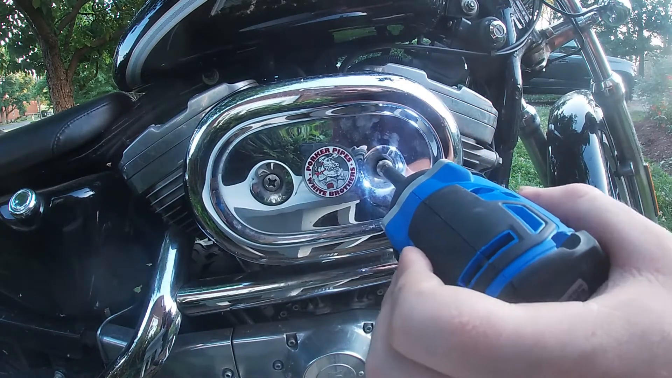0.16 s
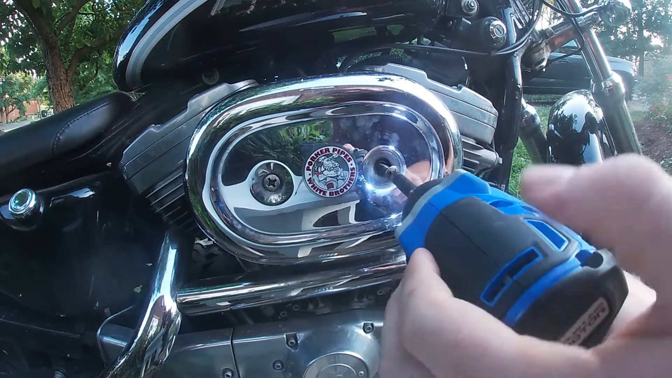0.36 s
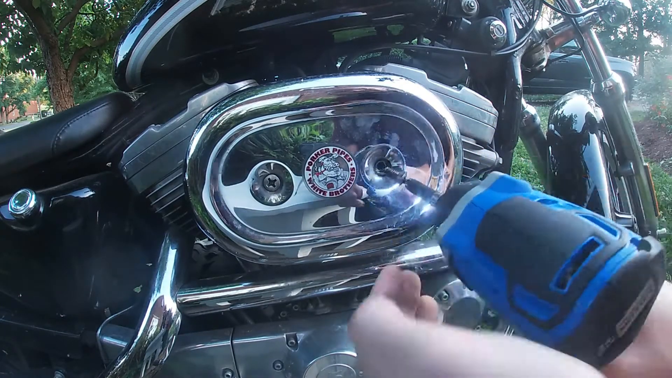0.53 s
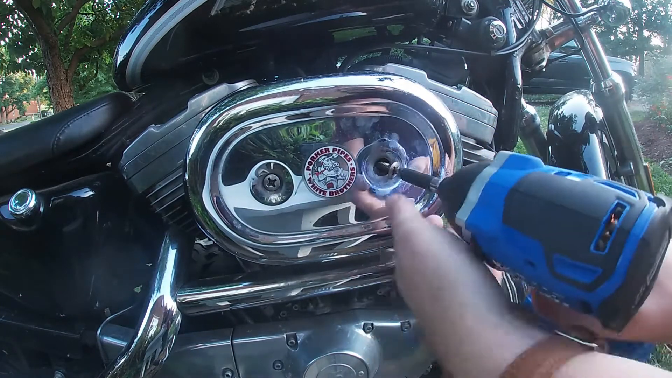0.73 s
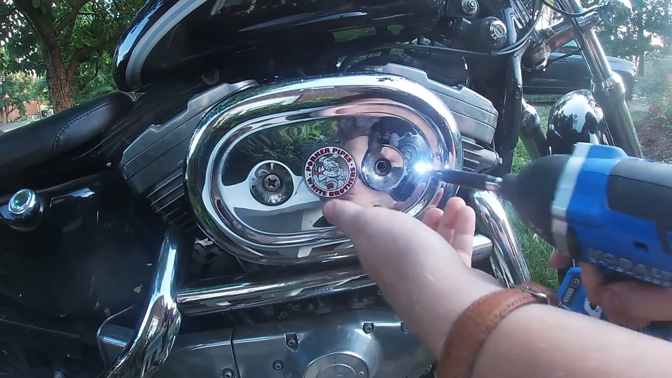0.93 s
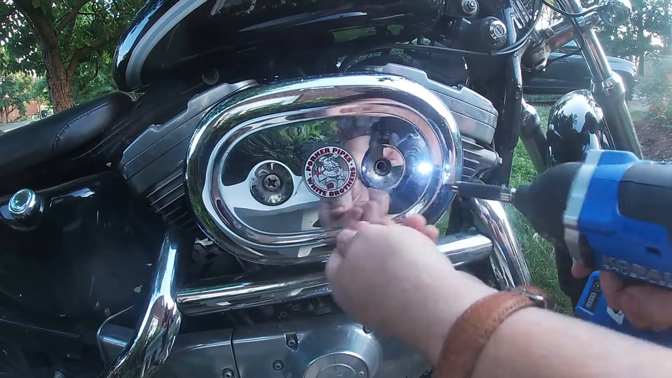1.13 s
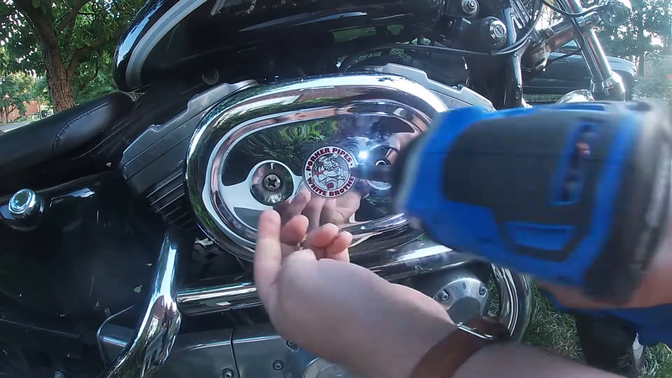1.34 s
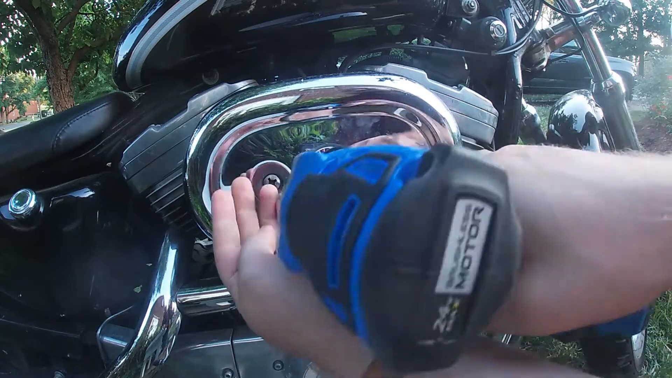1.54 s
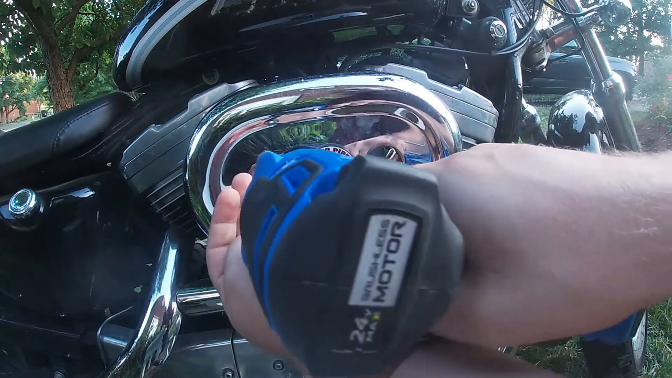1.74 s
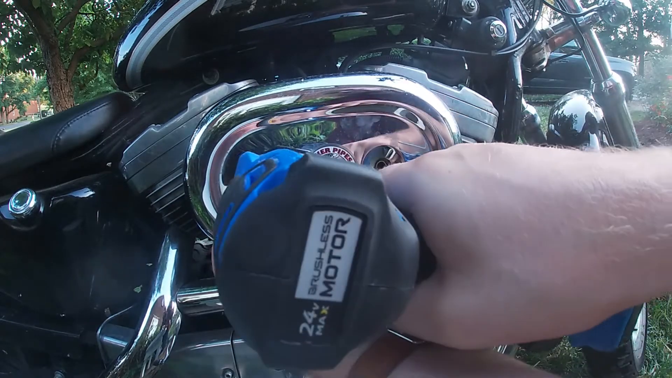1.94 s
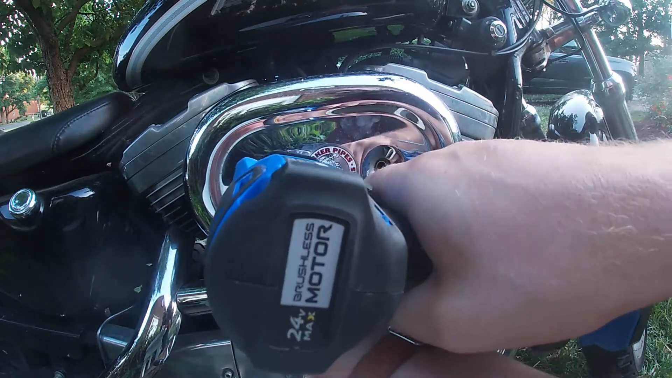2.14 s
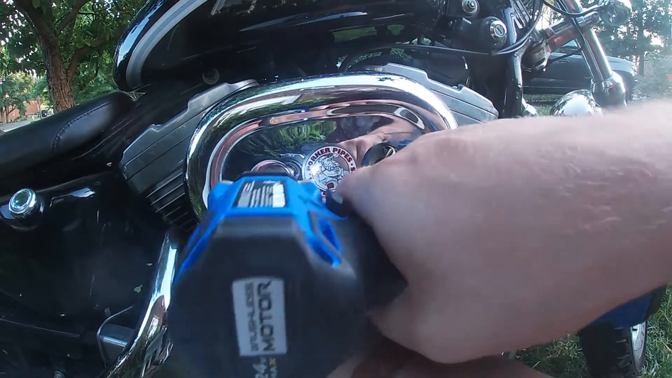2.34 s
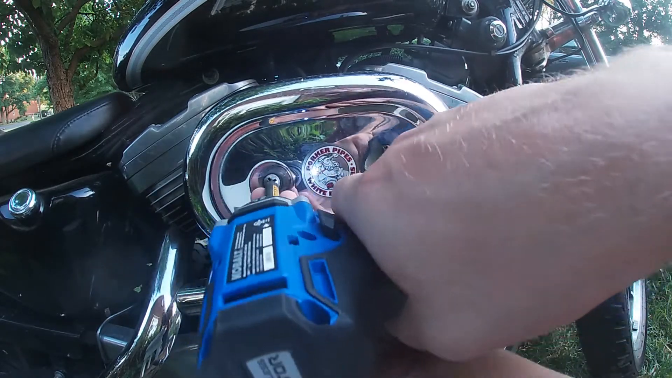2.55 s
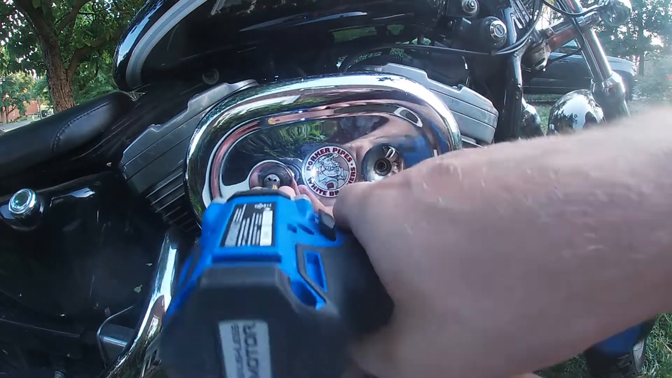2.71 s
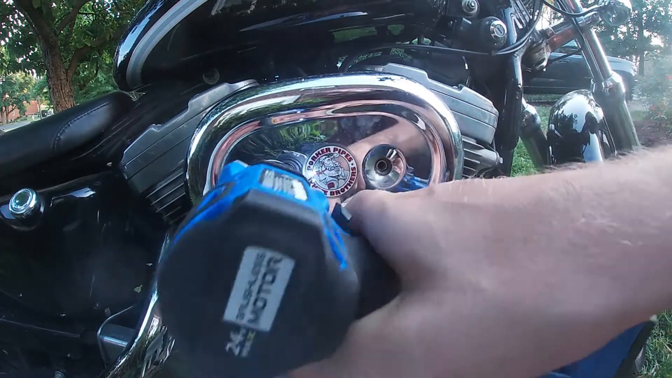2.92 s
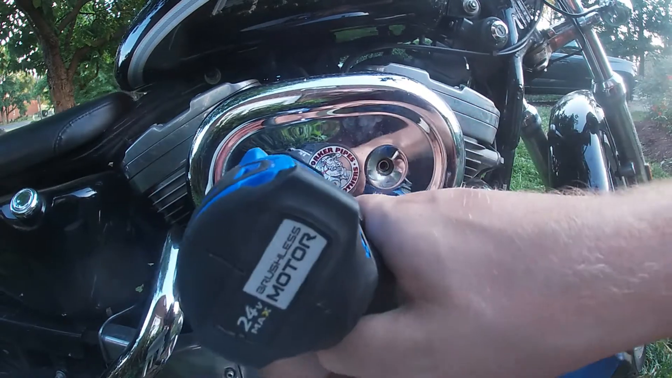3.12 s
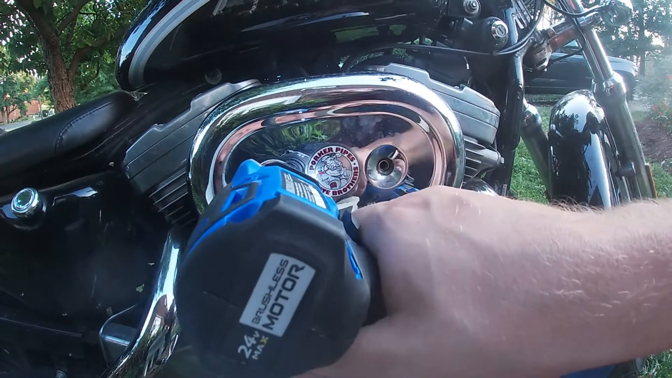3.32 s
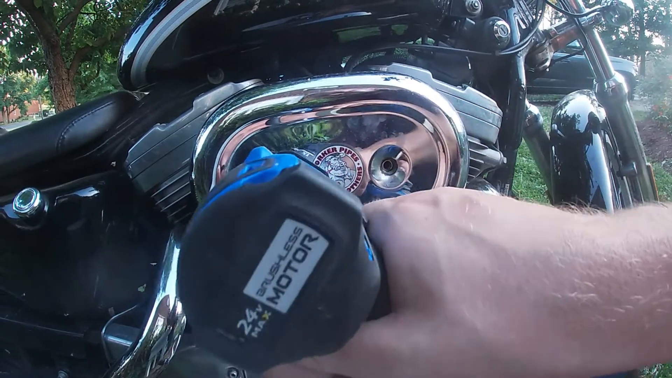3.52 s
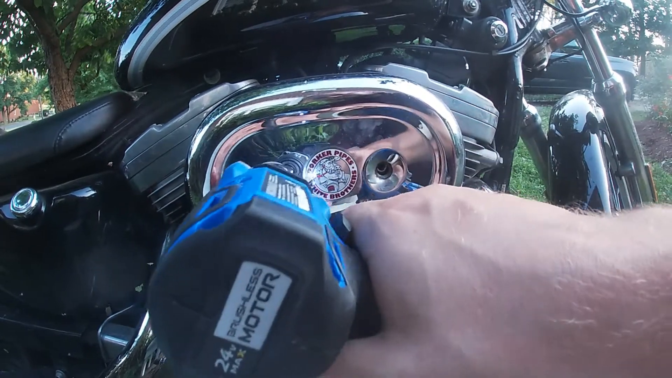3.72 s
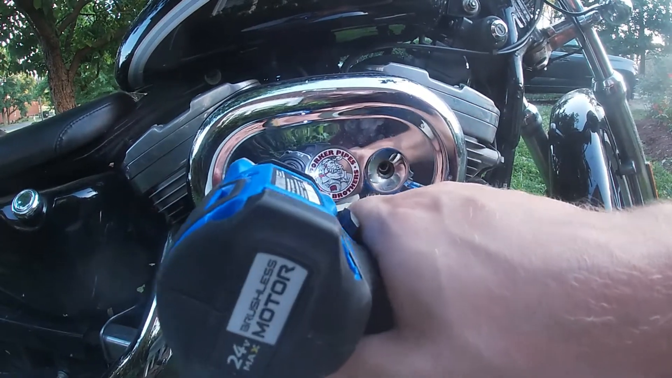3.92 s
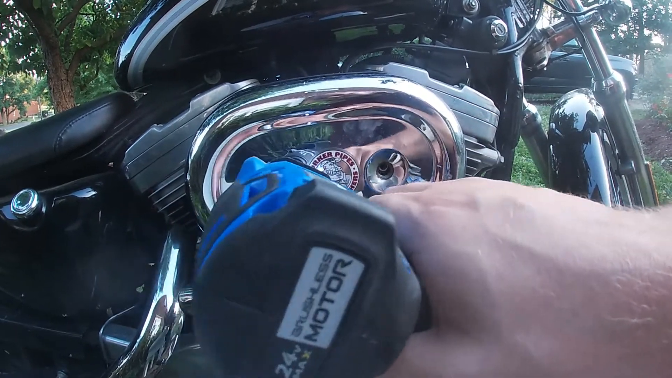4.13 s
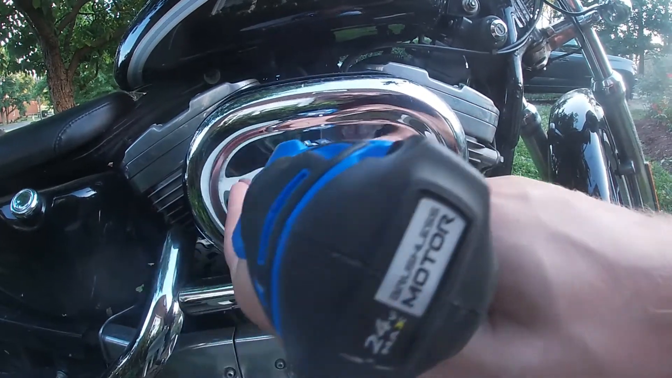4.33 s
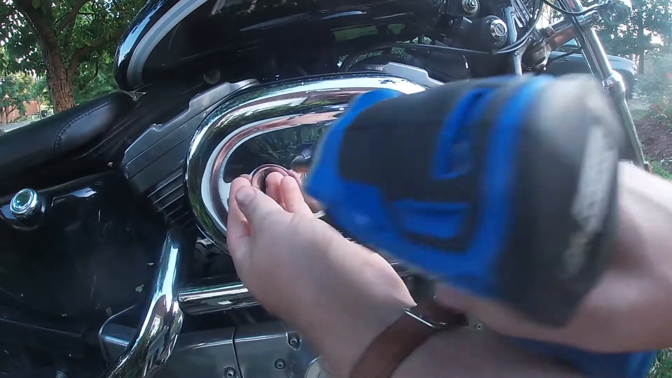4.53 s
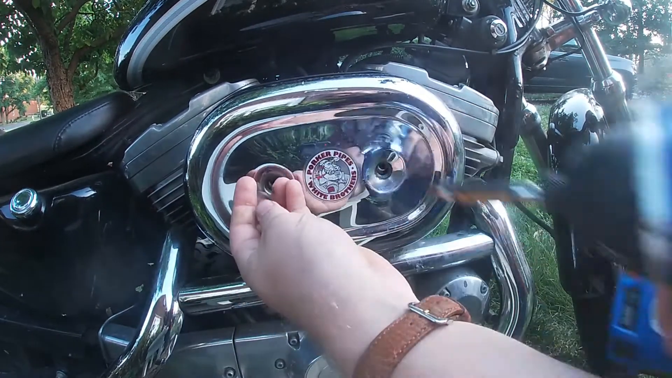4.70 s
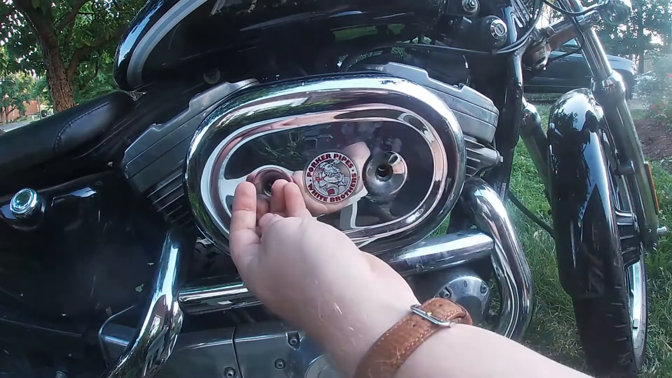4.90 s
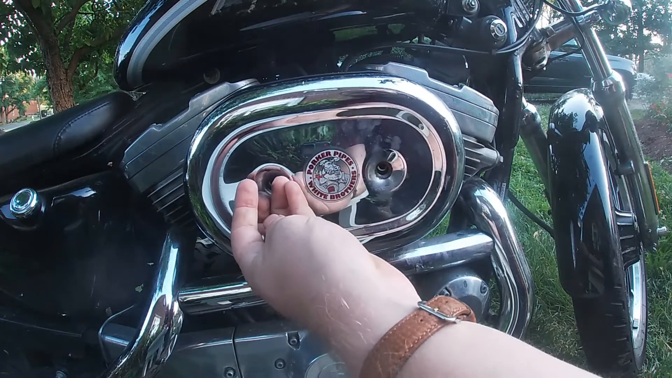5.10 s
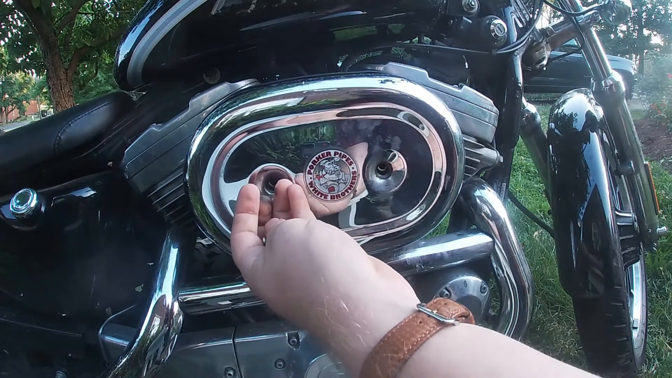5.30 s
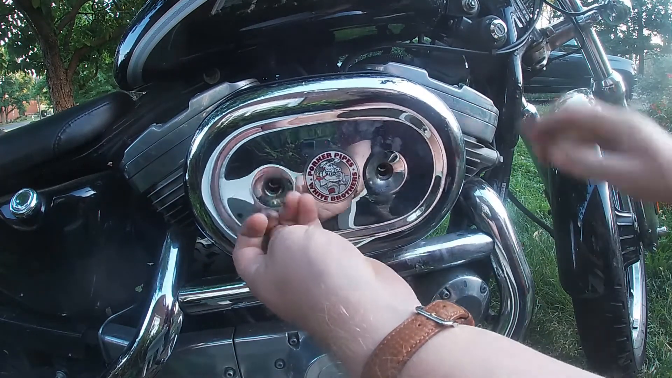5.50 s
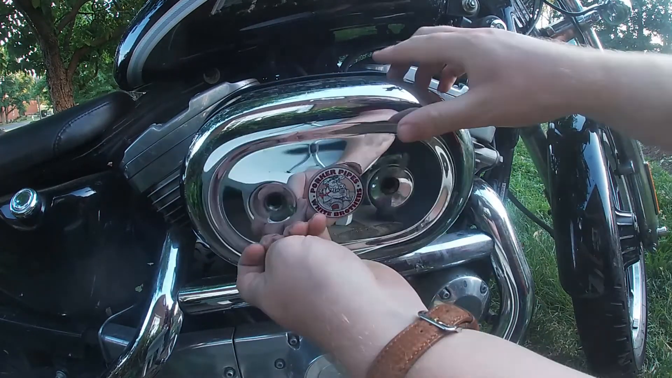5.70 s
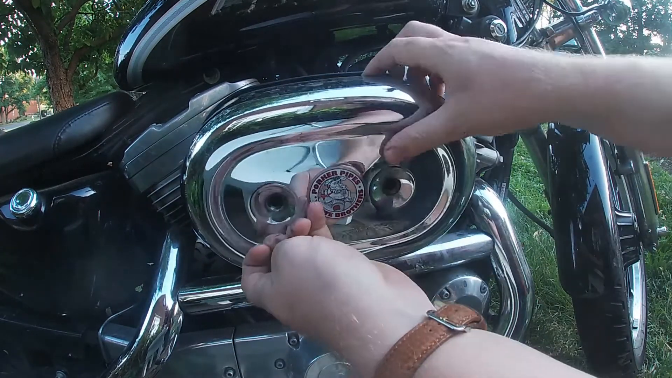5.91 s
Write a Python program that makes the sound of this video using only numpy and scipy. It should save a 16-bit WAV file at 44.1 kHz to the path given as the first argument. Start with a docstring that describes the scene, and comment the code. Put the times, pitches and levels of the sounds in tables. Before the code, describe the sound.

A cordless impact driver whirs in three short bursts outdoors, amid knocks and ticks on a metal cover, before a car swells past.

```python
"""Outdoors, close to a motorcycle: a cordless impact driver spins two bolts out of the chrome air-cleaner
cover. Three trigger pulls whine up and brake: commutation rings the stator, gears rattle in the housing.
On the second, hammer blows free a tight bolt. Bit, bolts and hands knock, tick and rub on the cover,
ringing its modes; an arm bumps the microphone. Faint birds chirp over far traffic, and at the end a car
swells past with tyre and exhaust noise."""
import sys
import numpy as np
from scipy import signal
from scipy.fft import rfft, irfft, next_fast_len
from scipy.io import wavfile
from scipy.ndimage import uniform_filter1d

SR = 44100
rng = np.random.default_rng(int(sys.argv[2]) if len(sys.argv) > 2 else 0)


def to_wav(s):
    """Save 16-bit WAV."""
    ch = np.atleast_2d(s).T  # columns
    pcm = np.round(np.clip(ch, -1, 1) * 32767)  # PCM
    wavfile.write(sys.argv[1], SR, pcm.astype(np.int16))


N = 266893

# street noise spectra (frequency [Hz], relative density [dB])
YARD_SPECTRUM = [(15, -50), (25, -9.5), (76, 1.5), (208, -2.5), (286, -9.5), (511, -18.5), (569, -22.5),
                 (846, -13), (966, -16.5), (1290, -17), (1970, -24), (7220, -42), (14000, -72)]
TYRE_SPECTRUM = [(190, -46), (330, -2), (679, 0.5), (846, -3), (989, -1), (1230, -7.5), (1400, -5.5),
                 (3810, -20.5), (5460, -26), (7720, -49), (14000, -56)]
EXHAUST_SPECTRUM = [(15, -51.5), (25, -3), (48, -25), (64, 1), (81, 0), (145, -9), (220, 1.5), (259, -10),
                    (300, -8), (390, -55), (660, -120)]
# street noise envelopes (time [s], relative level [dB])
AIR_ENVELOPE = [(0.0, -50), (0.24, -51.5), (4.4, -44)]
ENGINE_ENVELOPE = [(0.0, -50), (1.13, -49), (1.79, -43), (2.42, -46), (5.8, -37.5), (6.05, -37.5)]
TYRE_ENVELOPE = [(4.3, -59.5), (4.72, -43), (4.95, -40), (5.45, -42.5), (6.05, -41.5)]
# resonances (frequency [Hz], width [Hz], gain [dB])
COVER_MODES = [(282, 13, 10), (421, 28, 12), (776, 117, 6), (1624, 190, 4.5), (1986, 35, 2.5),
               (2610, 650, 4.5), (3190, 400, -0.5), (3840, 380, 1), (4430, 200, -3), (5800, 540, 0),
               (8560, 167, -3.5)]
HOUSING_MODES = [(790, 150, -4), (1470, 130, -15), (2580, 240, -7), (3980, 89, -8.5), (4890, 470, -15),
                 (9160, 350, -1)]
MIC_CASE_MODES = [(277, 155, 11.5), (1118, 90, 13), (1217, 66, -6)]
BUZZ_MODES = [(4740, 1100, 4), (6460, 1100, 5), (8200, 840, 1.5), (10500, 630, -9)]
# light metal-on-metal contacts (time [s], level [dB])
TICKS = [(0.083, -54), (0.8424, -48.5), (0.928, -45), (2.153, -43.5), (2.842, -47), (3.456, -47.5),
         (3.896, -45), (4.396, -60), (4.5296, -53), (4.604, -43), (5.374, -50.5), (5.802, -48.5)]
# trigger pulls (start [s], spin-up [s], coast [s], top rate [Hz], rate at braking [Hz],
# start lag [1 = none], rattle [dB], rattle treble [dB], kicks [dB], powered whine [dB],
# coasting whine [dB], mesh tone re whine [dB], cover hollow [dB], planet tones re rattle [dB])
PULLS = [(.117, .198, 0.13, 3787, 2910, 1.044, -22.5, 2, -21, -17, -17, 7, -15, -25),
         (3.497, 0.16, 0.11, 3680, 2677, 1.42, -22.5, 0, -13.5, -22, -19, -18, 8.5, -23),
         (3.915, .183, 0.11, 4173, 3143, 1.18, -22, -3.5, -17.5, -13.5, -28, -8, 3.5, -7)]
# gear rattle spectrum (frequency [Hz], relative density [dB])
GEAR_SPECTRUM = [(88, -50), (150, -10), (366, -7), (462, -4), (583, -9), (1340, -6.5), (1450, -6.5),
                 (1700, -6.5), (3830, -3.5), (6110, -17), (9360, -28), (15500, -44.5)]
# bit, bolt and tool striking the cover (time [s], level [dB], contact [ms], low-end weight [dB])
KNOCKS = [(.497, -29, 0.013, -13), (.508, -29, 0.011, 9.5), (0.7094, -40, 0.089, -25),
          (0.7433, -25.5, 0.17, 0), (0.7601, -23, 0.17, -12), (0.7874, -27, 0.09, 3.5),
          (0.8874, -41, 0.19, -16), (0.9429, -24, 0.029, -27), (1.0133, -19.5, 0.048, -33),
          (1.561, -20.5, 0.15, 3), (1.968, -20.5, 0.21, -3), (1.988, -29.5, 0.25, 6),
          (2.232, -32.5, 0.031, 3), (2.278, -34, 0.98, 18), (3.018, -37.5, .4, 4), (3.0982, -22, 0.3, 4.5),
          (3.604, -32, 0.021, 3), (3.6074, -24.5, 0.0062, -22), (4.743, -32.5, 0.46, 6)]
# slides on the cover (time [s], length [s], level [dB], contact [ms], low-end weight [dB])
RUBS = [(0.712, 0.048, -30.5, 0.37, 0), (0.757, 0.054, -24.5, 0.26, 1), (0.804, 0.16, -46, 0.2, -17),
        (2.188, 0.076, -41, 0.36, -24), (5.688, 0.083, -48.5, 0.14, -5), (5.991, 0.068, -38, 0.13, 3.5)]
# bumps on the cover's hollow (time [s], level [dB], frequency [Hz])
HOLLOW_BUMPS = [(1.561, -23, 742), (.724, -37, 450), (.785, -19.5, 291), (3.555, -19.5, 367),
                (3.58, -18, 206), (4.518, -31.5, 470), (4.744, -21.5, 478), (5.153, -31.5, 450)]
# bird calls (time [s], length [s], pitch [Hz], level [dB])
CHIRPS = [(1.78, 0.08, 7000, -60), (2.65, 0.065, 7340, -59), (2.2, .06, 6100, -61), (3.0, 0.071, 8400, -66)]
# arm against the microphone (time [s], thud [dB], thud frequency [Hz], case rattle [dB])
ARM_BUMPS = [(3.194, -15.5, 84, -32.5), (3.222, -15.5, 63.6, -21), (3.242, -11, 78, -38),
             (3.261, -13, 57, -33), (3.578, -16, 102, -51), (3.868, -23, 89, -39.5),
             (3.938, -20.5, 68.6, -19), (3.946, -14, 82.4, -45)]
# loose bolt in its hole (time [s], level [dB], chatter decay [ms])
JIGGLES = [(4.222, -27, 20), (4.252, -37, 15), (4.3, -45.5, 18), (4.385, -39.5, 6.4), (4.3963, -37, 5.6),
           (4.528, -50, 2.2)]
# bolt modes (frequency [Hz], relative level [dB], T60 [s])
BOLT_MODES = [(512, 1.5, .095), (2280, 0, 0.11), (2364, -6, .08), (2560, -4.5, .12), (3070, -14, .08),
              (3765, -25.5, 2.2), (4070, -12, 0.087), (4820, -12.5, .1), (5260, -8, .1), (5448, -12, 0.11),
              (5850, -14.5, 0.091)]

TIME_S, RING_S = np.arange(N) / SR, np.arange(8192) / SR
BINS_HZ = np.fft.rfftfreq(N, 1 / SR)
STATOR_HZ, HOLLOW_HZ = 3020, 483
BRAKE_S, FULL_TORQUE_HZ_PER_S = 0.036, 25400


def amp(db):
    """Decibels to gain."""
    return 10 ** (np.asarray(db) / 20)


def unit_rms(x):
    """Scale to rms 1."""
    return x / np.sqrt(np.mean(x ** 2) + 1e-20)


def unit_blow(x):
    """Scale to the energy of 10 ms at rms 1."""
    return x / np.sqrt(np.sum(x ** 2) / (SR / 100) + 1e-20)


def spectrum_gain(points, hz):
    """Gain of a spectrum table, interpolated in log frequency."""
    f, db = np.transpose(points)
    return amp(np.interp(np.log(hz + 1), np.log(f + 1), db))


def envelope(points):
    """Per-sample gain of an envelope table."""
    return amp(np.interp(TIME_S, *np.transpose(points)))


def place(events):
    """Mix (time [s], sound) pairs into one track."""
    out = np.zeros(N)
    for at_s, sound in events:
        part = out[round(at_s * SR):][:len(sound)]
        part += sound[:len(part)]
    return out


def filtered(x, response):
    """Apply a frequency response."""
    size = next_fast_len(2 * len(x))
    return irfft(rfft(x, size) * response(np.fft.rfftfreq(size, 1 / SR)), size)[:len(x)]


def resonances(modes, hz):
    """Summed response of band-pass modes."""
    return sum(amp(db) * 1j * hz * width / (f * f - hz * hz + 1j * hz * width) for f, width, db in modes)


def wobble(count, span):
    """Noise smoothed over span samples, rms 1."""
    return unit_rms(uniform_filter1d(rng.standard_normal(count), size=span))


def grains(count, per_s, spread_db):
    """Tiny random collisions of uneven size."""
    size = amp(spread_db * np.minimum(rng.exponential(1, count), 4))
    return unit_rms(size * rng.standard_normal(count) * (rng.random(count) < per_s / SR))


def wash(spectrum, band_hz, waver_db):
    """Shaped noise, rms 1 in the band, times a slow waver."""
    shape = spectrum_gain(spectrum, BINS_HZ)
    in_band = (BINS_HZ > band_hz[0]) & (BINS_HZ < band_hz[1])
    share = np.sum(shape[in_band] ** 2) / np.sum(shape ** 2)
    waver = unit_rms(filtered(rng.standard_normal(N), lambda hz: np.exp(-hz / 12)))
    noise = unit_rms(irfft(rfft(rng.standard_normal(N)) * shape, N))
    return noise / np.sqrt(share) * amp(waver_db * waver)


def street():
    """Yard air and far traffic give way to a near car: tyres first, then exhaust."""
    near = np.interp(TIME_S, [4.2, 4.8], [0, 1])
    engines = envelope(ENGINE_ENVELOPE)
    air = filtered(wash(YARD_SPECTRUM, (500, 2000), 0.37), lambda hz: hz ** 2 / (hz ** 2 + 280 ** 2))
    traffic = filtered(wash(YARD_SPECTRUM, (60, 260), 0.65), lambda hz: 1 / (1 + (hz / 300) ** 4))
    far = amp(-4) * envelope(AIR_ENVELOPE) * air + amp(-1) * engines * traffic
    tyres = amp(-1.5) * envelope(TYRE_ENVELOPE) * wash(TYRE_SPECTRUM, (600, 2000), 0.55)
    exhaust = amp(3.5) * engines * wash(EXHAUST_SPECTRUM, (60, 260), 1.2)
    exhaust_in = np.interp(TIME_S, [4.33, 5.08], [0, 1])
    return np.sqrt(1 - near) * far + np.minimum(2 * near, 1) * tyres + exhaust_in * exhaust


def chatter(decay_ms, first_hit):
    """Force of one sharp contact and a dying flurry of smaller ones."""
    flurry = rng.standard_normal(len(RING_S)) * np.exp(-RING_S * 1000 / decay_ms)
    flurry /= np.linalg.norm(flurry)
    flurry[0] += first_hit / 2
    return np.pad(flurry, (SR // 2000, 0))[:len(RING_S)]


def cover(force, contact_ms, weight_db):
    """Each spot favours its own modes; long contact dulls, a heavy push lifts the lows."""
    spot = rng.standard_normal((len(COVER_MODES), 2))
    modes = [(hz * (1 + 0.027 * shift), width, db + 0.87 * gain)
             for (hz, width, db), (shift, gain) in zip(COVER_MODES, spot)]

    def response(hz):
        softness = (1 + 1j * hz * np.pi * contact_ms / 1000) ** -2
        push = (amp(weight_db) + 1j * hz / 900) / (1 + 1j * hz / 900)
        radiation = spectrum_gain(
            [(40, -23), (170, 1.5), (300, 6.5), (5500, 1.5), (9500, -4), (15000, -20)], hz)
        return softness * push * radiation * (1 + resonances(modes, hz))
    attack = np.minimum(np.arange(len(force)) / (SR / 2000), 1)
    return filtered(force, response) * attack


def knock(db, contact_ms, weight_db, chatter_ms=3.9, first_hit=0.44):
    """One chattering contact rings the cover."""
    return amp(db) * unit_blow(cover(chatter(chatter_ms, first_hit), contact_ms, weight_db))


def ticks(faint_per_s=5.3):
    """Light metal contacts, with fainter ones at random times."""
    draws = rng.random((round(faint_per_s * N / SR), 2))
    faint = [(when * N / SR, -60.5 - 2 * softer) for when, softer in draws]
    return place((at_s, knock(db, contact_ms=0.028, weight_db=-22)) for at_s, db in TICKS + faint)


def motor_rate(t, spin_up_s, coast_s, top_hz, brake_hz, lag, creep_hz=70.7, crest_s=0.014):
    """Commutation rate [Hz]: eases up, sinks with the trigger released, then brakes."""
    rise = np.sin(np.pi / 2 * np.minimum(t / spin_up_s, 1) ** lag)
    released_s = np.maximum(t - spin_up_s, 0)
    sink = (np.hypot(released_s, crest_s) - crest_s) / (np.hypot(coast_s, crest_s) - crest_s)
    brake = np.clip(1 - (t - spin_up_s - coast_s) / BRAKE_S, 0, 1)
    return creep_hz + (top_hz - creep_hz - (top_hz - brake_hz) * sink) * rise * brake


def field_kicks(cycles, rate_hz, speed):
    """At low rates each field step is a separate, uneven kick that rings the stator."""
    steps = np.diff(np.floor(cycles), prepend=-1) * (1 + 0.54 * rng.standard_normal(len(cycles)))
    steps *= rng.choice([-1, 1, 1], len(cycles))
    kicks = speed ** 0.15 * steps * np.sqrt(SR / rate_hz) / (1 + (rate_hz / 2000) ** 4)
    return filtered(kicks, lambda hz: 0.5 + resonances([(STATOR_HZ, 200, 2)], hz))


def stator_whine(cycles, rate_hz, torque, kicks, powered_db, coasting_db, mesh_db):
    """Commutation sweeps through the stator resonance; gear teeth add a tone under torque."""
    phase = 2 * np.pi * cycles
    tones = np.sin(phase) + amp(mesh_db) * torque ** 3 * np.sin(phase * 5 / 4)
    tones *= 1 + 0.087 * wobble(len(cycles), span=130)
    tones *= rate_hz ** 6 / (rate_hz ** 6 + 2400.0 ** 6)
    tones *= amp(coasting_db + (powered_db - coasting_db) * torque)
    return filtered(np.sqrt(2) * tones + kicks, lambda hz: resonances([(STATOR_HZ, 365, 0)], hz))


def gear_rattle(cycles, rate_hz, speed, treble_db, hollow_db, planets_db):
    """Tooth impacts, shaft orders and three planet gears ring the housing and the cover's hollow."""
    shaft_rad = 2 * np.pi * cycles / 12
    orders = unit_rms(sum(np.cos(k * shaft_rad + rng.uniform(0, 2 * np.pi)) for k in range(2, 40)))
    teeth = grains(len(cycles), per_s=11000, spread_db=2) * (1 + 0.17 * np.cos(shaft_rad))
    planets = unit_rms(sum(np.cos(k * shaft_rad) for k in range(6, 40, 3) if k != 12))
    force = teeth + 0.3 * speed * orders + amp(planets_db) * speed ** 2 * planets
    modes = HOUSING_MODES + [(HOLLOW_HZ, 70, hollow_db)]
    rattle = filtered(force, lambda hz: spectrum_gain(GEAR_SPECTRUM, hz) * (0.5 + resonances(modes, hz)))
    body = filtered(rattle, lambda hz: 1 / (1 + (hz / 1900) ** 4))
    body_gain = amp(11.6 * (rate_hz / 3800 - 1.5))  # the body shakes only at speed
    rattle = unit_rms(rattle + body * (body_gain - 1))
    # turned away, the tool shades its own treble
    return speed ** 0.65 * filtered(rattle, lambda hz: amp(treble_db * hz ** 4 / (hz ** 4 + 7000 ** 4)))


def bolt_load(time_s, free_s=3.585):
    """Gains for rising strain before the tight bolt lets go, and brief slack after."""
    gap_s = abs(time_s - free_s)
    strain_db = 5.5 * np.exp(-gap_s / 0.14) * (time_s < free_s)
    slack_db = -19.5 * np.exp(-gap_s / 0.063) * (time_s >= free_s)
    return amp(uniform_filter1d(np.array([strain_db, slack_db]), size=300))


def trigger_pull(start_s, spin_up_s, coast_s, top_hz, brake_hz, lag, rattle_db, treble_db,
                 kick_db, powered_db, coasting_db, mesh_db, hollow_db, planets_db):
    """One motor run: a fluttering rate drives both whine and rattle."""
    t = np.arange(0, spin_up_s + coast_s + BRAKE_S, 1 / SR)
    rate_hz = motor_rate(t, spin_up_s, coast_s, top_hz, brake_hz, lag)
    torque = uniform_filter1d(np.clip(np.gradient(rate_hz) * SR / FULL_TORQUE_HZ_PER_S, 0, 1), size=600)
    rate_hz *= 1 + 0.006 * wobble(len(t), span=130)
    cycles, speed = np.cumsum(rate_hz) / SR, rate_hz / top_hz
    kicks = amp(kick_db) * field_kicks(cycles, rate_hz, speed)
    whine = stator_whine(cycles, rate_hz, torque, kicks, powered_db, coasting_db, mesh_db)
    rattle = amp(rattle_db) * gear_rattle(cycles, rate_hz, speed, treble_db, hollow_db, planets_db)
    strain, slack = bolt_load(start_s + t)
    return slack * (whine + strain * rattle) * signal.windows.tukey(len(t), 0.005)


def driver():
    """Three motor runs, each opening with a snap as the gears take up their play."""
    events = []
    for start_s, *settings in PULLS:
        events.append((start_s, trigger_pull(start_s, *settings)))
        events.append((start_s, knock(-40, contact_ms=0.038, weight_db=-24.5)))
    return place(events)


def knocks():
    """Bit, bolt and tool strike the cover; heavier pushes chatter longer."""
    return place((at_s, knock(db, contact_ms, weight_db, chatter_ms=2.7 + 2.56 * min(amp(weight_db), 2)))
                 for at_s, db, contact_ms, weight_db in KNOCKS)


def rocking_bolt(start_s=0.536, gap_s=0.025):
    """The first bolt rocks to rest in the bit: evenly spaced, weakening taps."""
    return place((start_s + k * gap_s, knock(-38 - 1.8 * k, contact_ms=0.17, weight_db=-18))
                 for k in range(4))


def rubs():
    """Tool and fingers slide on the cover in a stream of tiny collisions."""
    events = []
    for at_s, length_s, db, contact_ms, weight_db in RUBS:
        friction = grains(round(length_s * SR), per_s=2500, spread_db=4.4)
        rub = unit_rms(cover(friction, contact_ms, weight_db))
        events.append((at_s, amp(db) * rub * signal.windows.tukey(len(rub), 0.7)))
    return place(events)


def damped_swing(hz, peak_s, ramp_s):
    """One mode under a linear rise and exponential decay."""
    return RING_S / ramp_s * np.exp(1 - RING_S / peak_s) * np.sin(2 * np.pi * hz * RING_S)


def hollow_bumps():
    """Each bump sounds one hollow mode of the cover."""
    return place((at_s, amp(db) * damped_swing(hz, peak_s=0.0047, ramp_s=0.0051))
                 for at_s, db, hz in HOLLOW_BUMPS)


def buzz(start_s=1.31, length_s=0.3, db=-59.5):
    """A faint, high, grainy buzz."""
    grit = grains(round(length_s * SR), per_s=4700, spread_db=0.9)
    sound = unit_rms(filtered(grit, lambda hz: resonances(BUZZ_MODES, hz) ** 2))
    return place([(start_s, amp(db) * sound * signal.windows.tukey(len(sound), 0.5))])


def whistle(length_s, hz, db):
    """A short tone with an arched, wavering pitch."""
    arch = np.hanning(round(length_s * SR))
    pitch_hz = hz * (1 + 0.0295 * (arch - 1) + 0.035 * wobble(len(arch), span=60))
    return amp(db) * arch * np.sin(2 * np.pi * np.cumsum(pitch_hz) / SR)


def birds():
    """Far birds, one whistle per chirp."""
    return place((at_s, whistle(length_s, hz, db)) for at_s, length_s, hz, db in CHIRPS)


def arm_bumps():
    """An arm hits the microphone's case: a low thud and a short rattle."""
    events = []
    for at_s, thud_db, hz, rattle_db in ARM_BUMPS:
        force = chatter(decay_ms=11, first_hit=1.43)
        rattle = filtered(force, lambda f: resonances(MIC_CASE_MODES, f) / (1 + (f / 7000) ** 4))
        events.append((at_s, amp(thud_db) * damped_swing(hz, peak_s=0.006, ramp_s=0.0054)))
        events.append((at_s, amp(rattle_db) * unit_blow(rattle)))
    return place(events)


def hammer(start_s=3.553, blows_per_s=115, freeing_blow=3):
    """Five blows, each harder and with less low end than the last; the loudest frees the bolt."""
    events = []
    for k in range(5):
        db = -12 if k == freeing_blow else -20.5
        blow = knock(db, contact_ms=0.17 * 0.6 ** k, weight_db=8.5 - 3.5 * k,
                     chatter_ms=1.13, first_hit=0.66)
        events.append((start_s + k / blows_per_s, blow))
    return place(events)


def loose_bolt():
    """The bolt jiggles in its hole, ringing and shaking the cover."""
    t = np.arange(SR) / SR
    ring = unit_blow(sum(amp(db - 60 * t / t60_s) * np.sin(2 * np.pi * hz * t)
                         for hz, db, t60_s in BOLT_MODES))
    ring[:len(RING_S)] += knock(-8.5, contact_ms=0.15, weight_db=0, chatter_ms=5.2, first_hit=0)
    return place((at_s, amp(db) * unit_blow(signal.fftconvolve(chatter(decay_ms, first_hit=0.27), ring)))
                 for at_s, db, decay_ms in JIGGLES)


def finger_squeak(start_s=5.692):
    """A finger squeaks on the chrome."""
    return place([(start_s, whistle(length_s=0.039, hz=4650, db=-46))])


def reflections(x, t60_s=0.13, wet_db=-16, delay_s=0.003):
    """Short scatter off the motorcycle and the ground."""
    taps = grains(len(RING_S), per_s=4000, spread_db=1) * amp(-60 * RING_S / t60_s) * (RING_S > delay_s)
    return amp(wet_db) * signal.fftconvolve(x, taps / np.linalg.norm(taps))[:N]


def scene():
    """Tool and cover sounds with reflections, the rest dry; mono on two channels."""
    work = ticks() + driver() + knocks() + rocking_bolt()
    work += rubs() + hollow_bumps() + hammer() + loose_bolt()
    mono = work + reflections(work) + street() + buzz() + birds() + arm_bumps() + finger_squeak()
    return np.array([mono, mono])


def record(dry):
    """Soft peak limit, treble roll-off, band limit."""
    ceiling, rolloff_hz, edge_hz = 0.82, 13000, 15700
    rounded = dry / (1 + (abs(dry) / ceiling) ** 4) ** 0.25
    dulled = signal.sosfilt(signal.butter(2, rolloff_hz, fs=SR, output="sos"), rounded)
    band_limit = signal.firwin(511, edge_hz, window=("kaiser", 9), fs=SR)
    return signal.oaconvolve(dulled, band_limit[None], "same")


dry = scene()
out = record(dry)
to_wav(out)
```